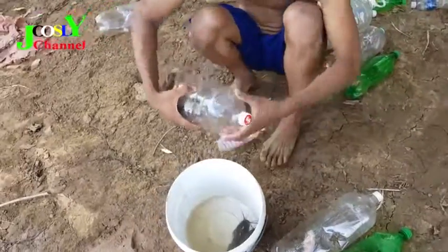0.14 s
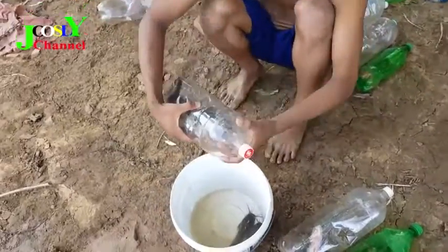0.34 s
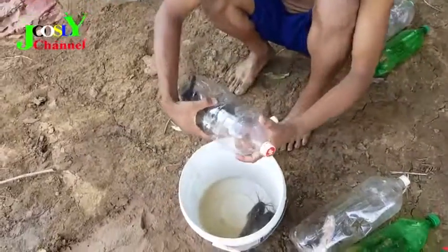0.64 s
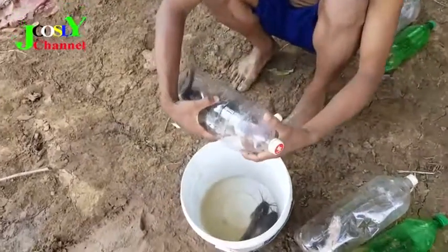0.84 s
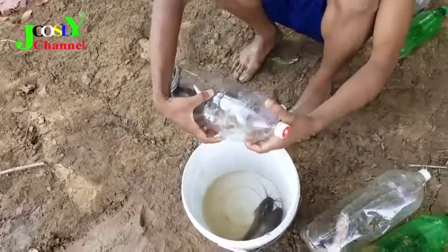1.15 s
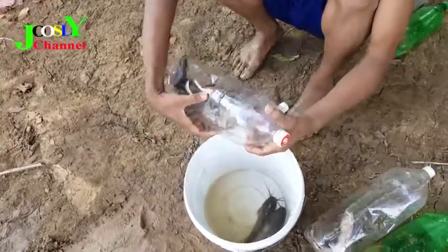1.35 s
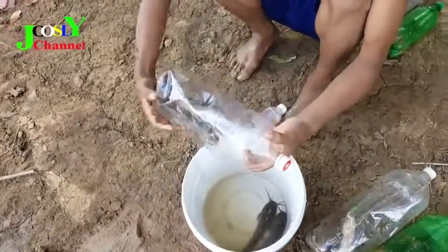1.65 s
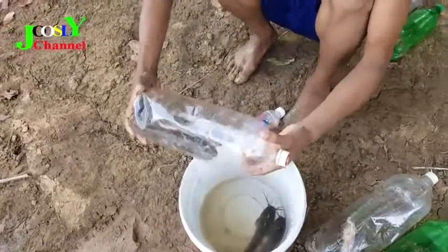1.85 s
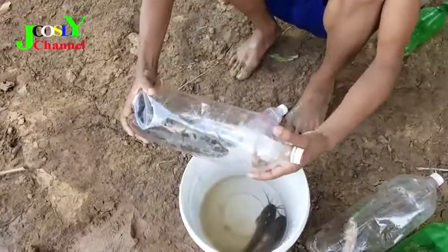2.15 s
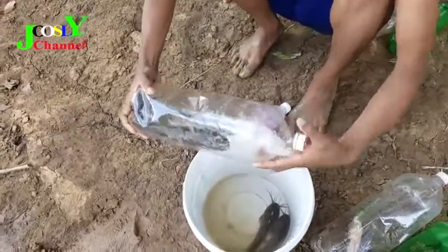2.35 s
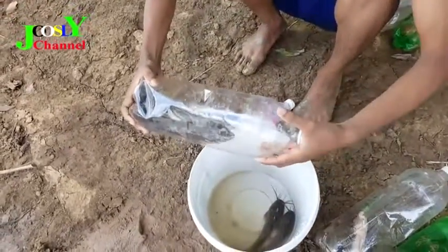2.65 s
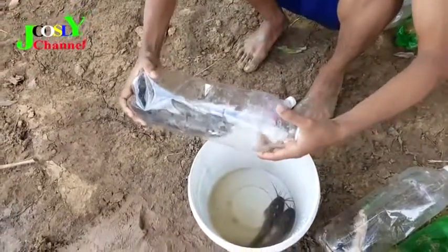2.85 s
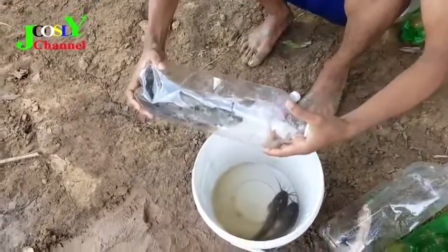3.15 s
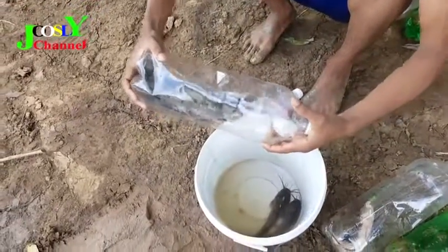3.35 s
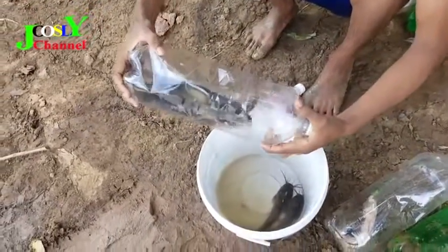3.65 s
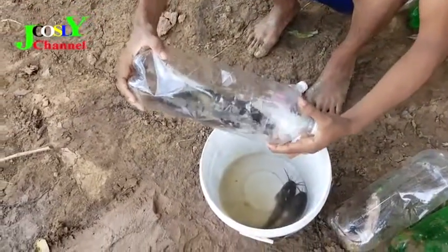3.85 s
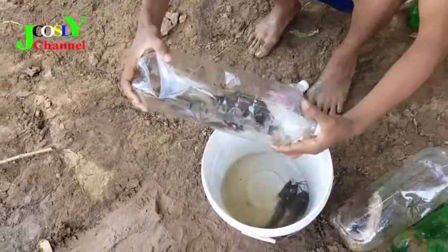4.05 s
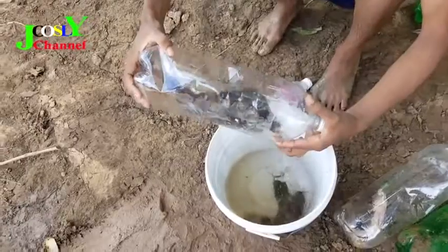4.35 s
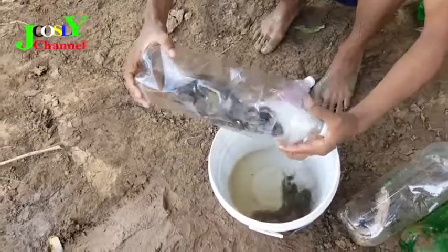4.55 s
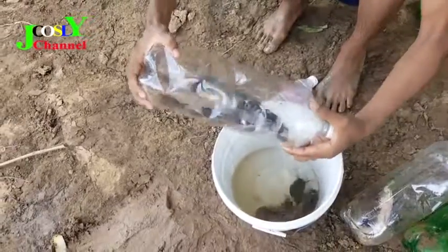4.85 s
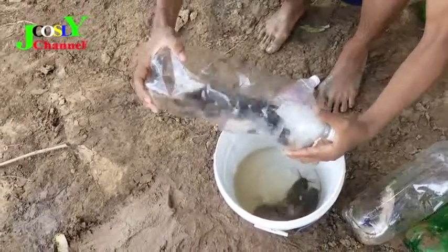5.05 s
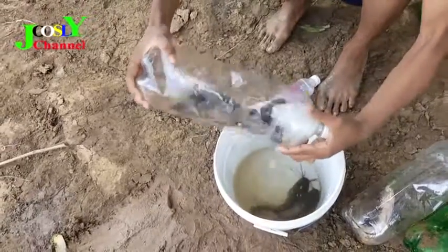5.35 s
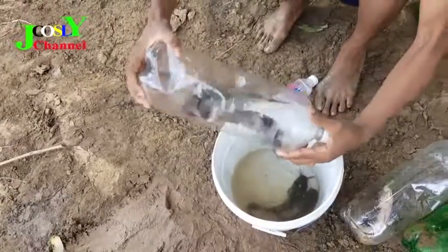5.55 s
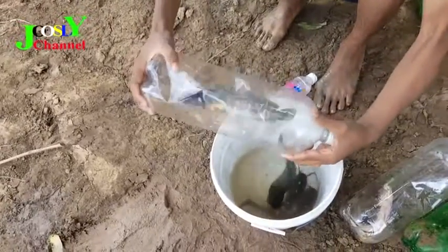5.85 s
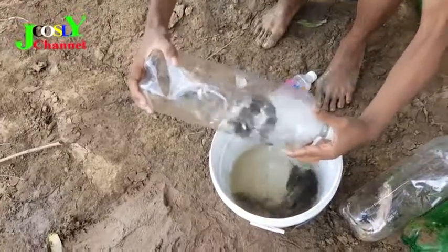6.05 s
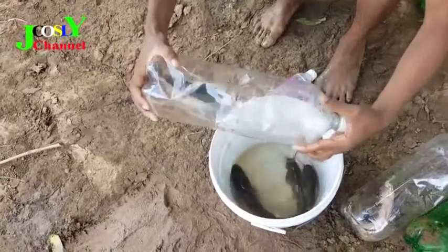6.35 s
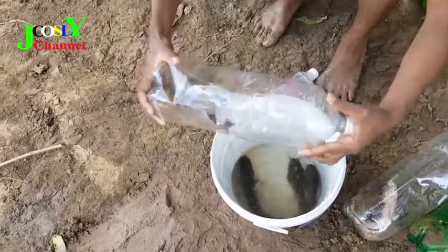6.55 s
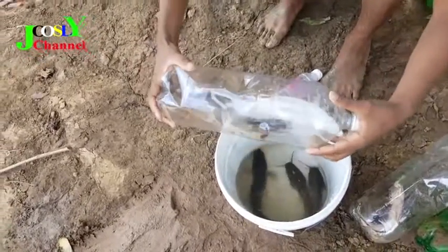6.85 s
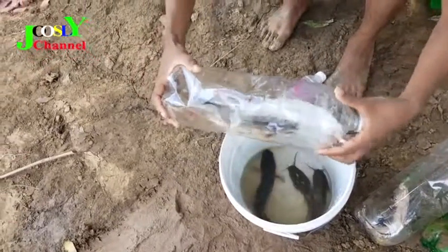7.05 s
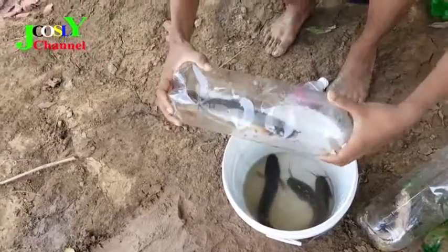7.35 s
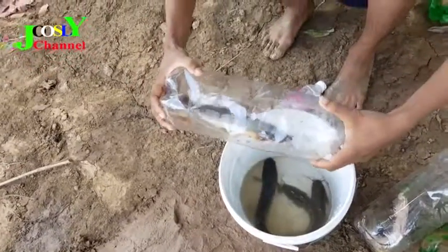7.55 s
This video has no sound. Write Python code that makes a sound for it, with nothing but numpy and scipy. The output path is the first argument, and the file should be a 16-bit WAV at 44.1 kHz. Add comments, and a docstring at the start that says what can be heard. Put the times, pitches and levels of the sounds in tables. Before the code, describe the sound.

A large thin plastic bottle is squeezed close to the microphone outdoors, over a faint steady rumble and hiss. For the first three seconds it buckles in irregular sharp snaps and hollow crackles, with dense clusters around 1.2 seconds and from 2.5 to 3.2 seconds, and soft rubbing in between. A lull follows. Just after 4 seconds come tiny wet squeaks and water blips, and water starts leaving the neck in short, light spurts. From about 4.8 to 6.3 seconds fish slither and scrape along the plastic wall, among small bubbling drips, wet ticks and occasional duller snaps. The water stops by about 6.4 seconds, as the bottle gives a few more loud snaps lasting until 6.6 seconds. Two very faint, falling bird notes sound far off at about 6.4 and 7 seconds. Only light rubbing and the outdoor background remain until about 7.7 seconds.

```python
"""A large thin plastic bottle is squeezed and tipped over a bucket outdoors while fish slither inside.
Its wall buckles in snaps and wet bodies scrape along it; both are runs of small slips that excite the
modes of the wall and the boom of the enclosed air. Wet squeaks and short tonal water blips glide in
pitch, and water leaves the neck in gushes of spray and tiny ringing bubbles. Two faint bird notes come
near the end. All this reaches two microphone ports, over the far rumble and hiss of a yard."""
import sys
import numpy as np
from scipy import signal
from scipy.fft import rfft, irfft, next_fast_len
from scipy.io import wavfile
from scipy.ndimage import uniform_filter1d

SR = 44100
rng = np.random.default_rng(int(sys.argv[2]) if len(sys.argv) > 2 else 0)


def file_out(sig):
    """Save sig as 16-bit WAV at sys.argv[1]."""
    # one column per channel
    cols = np.atleast_2d(sig).T
    # limit, then scale
    lim = np.clip(cols, -1, 1)
    pcm = np.round(lim * 32767).astype(np.int16)
    wavfile.write(sys.argv[1], SR, pcm)


N = 339129

# Hands and fish sliding on plastic. Each row: time in seconds, relative skin and fizz levels in dB.
SLITHER_LEVELS = [(0.0, -51, -64), (0.81, -54.5, -65), (1.26, -52, -66), (1.43, -52, -63.5),
                  (2.27, -54.5, -62), (2.67, -53.5, -54), (2.7, -52, -52.5), (2.8, -51.5, -46.5),
                  (2.87, -52.5, -57), (2.94, -46, -52), (3.149, -60.5, -78), (3.41, -59, -74),
                  (4.15, -55, -66), (4.3, -54, -64), (4.65, -56, -65), (5.08, -47.5, -50),
                  (5.2, -56.5, -64), (5.74, -50.5, -63), (6.04, -46, -59), (6.19, -64, -62),
                  (6.51, -46.5, -59.5), (6.87, -54, -63.5), (7.69, -57, -68.5)]
# Spectrum of that friction. Each row: frequency in Hz, relative density in dB.
SKIN_SPECTRUM = [(71, -37.5), (120, 6.5), (323, 4), (428, -9.5), (629, -0.5), (942, -4), (1470, -37),
                 (1910, -11.5), (2250, 0), (2800, -13), (4650, -15.5), (6420, -31), (8500, -37.5),
                 (11000, -41.5), (15000, -43.5)]
# Spectrum of the far rumble and hiss. Each row: frequency in Hz, relative density in dB.
YARD_SPECTRUM = [(15, -39.5), (25, -50), (97, 6.5), (149, -0.5), (229, -15.5), (301, -7.5), (363, -14),
                 (607, -20.5), (1020, -15.5), (1130, -15.5), (1560, -17.5), (2350, -23.5), (2840, -26),
                 (4250, -31), (16000, -61)]
# Slow dips and swells of that noise. Each row: time in seconds, relative level in dB.
YARD_LEVELS = [(0.0, -47.5), (2.72, -49), (3.41, -57.5), (4.03, -47.5), (4.52, -50.5), (5.46, -46),
               (7.69, -50)]
# Likeness of that noise in the two channels. Each row: frequency in Hz, left-right correlation.
YARD_CORRELATION = [(30, 0.75), (60, 0.95), (150, 0.96), (380, 0.81), (950, -0.15), (2380, -0.31),
                    (5980, -0.21), (15000, 0.11)]
# The bottle's five bands, from low to high: boom, knock, clack, tick, fizz. Each entry: an edge in Hz.
BAND_EDGES_HZ = [200, 450, 1500, 3000, 7000, 15500]
# Bottle modes, air column first, then wall. Each row: frequency in Hz, relative level in dB,
# T60 in seconds before added damping.
BOTTLE_MODES = [(272, 8, 0.1), (295, 15, 0.125), (380, 5, 0.017), (414, 3.5, 0.05), (626, 4, 0.075),
                (729, 8, 0.04), (950, 4, 0.043), (1180, 5, 0.03), (1700, 5, 0.05), (2165, 8, 0.035),
                (4030, 3.5, 0.016), (4570, 6, 0.018), (4840, 10.5, 0.012), (5530, 7, 0.02)]
# Dense wall modes, heard as a rattle. Each row: frequency in Hz, T60 in seconds before added damping.
RATTLE_DECAY = [(150, 0.33), (400, 0.06), (1000, 0.069), (2800, 0.057), (7300, 0.059), (15000, 0.15)]
# Spectrum of that rattle. Each row: frequency in Hz, relative level in dB.
RATTLE_SPECTRUM = [(150, -10), (300, -3.5), (600, -1), (1500, -7), (2200, 1), (3200, -16.5), (4500, -2.5),
                   (5600, -20.5), (7500, -34.5), (10000, -29), (15500, -44)]
# Fish and water slide to the neck and damp the wall. Each row: time in seconds, share of ring time left.
WALL_DAMPING = [(3.3, 1.), (4.5, .4), (5, .6), (6.1, .55), (6.4, .9)]
# Scrapes along the wall. Each row: centre in seconds, panel frequency in Hz, knock peak in dB,
# boom over knock in dB, tick over knock (sharpness) in dB, stroke time in ms.
WALL_SCRAPES = [(0.159, 2500, -51, 14, -7, 13), (0.745, 650, -46.5, 18.5, -23, 15.4),
                (1.037, 1035, -44, -3, -2, 14), (1.228, 680, -23, -7, -11, 9),
                (1.246, 710, -28.5, 0, -0.5, 19), (1.293, 660, -38.5, 5, -2, 53),
                (1.358, 2180, -52.5, -5, 11, 12), (1.366, 410, -42, 7, -8, 54),
                (2.439, 600, -48.5, 2, -18, 15), (2.492, 625, -28.5, 2, -23, 13.6),
                (2.915, 660, -43, -12, -3, 27), (3.13, 695, -46, -1, -11.5, 10),
                (4.207, 668, -54.5, 14, 2, 71), (4.254, 700, -67, 8, 21.5, 56),
                (4.345, 2220, -76, 4, 14, 34), (4.498, 2290, -84.5, 5, 29, 10),
                (4.541, 2280, -87.5, 25, 33, 15), (4.709, 2360, -62.5, -3, 7.5, 15),
                (4.82, 590, -43.5, -4, -36, 20), (4.862, 635, -45.5, -5, -3.5, 17),
                (4.95, 636, -41.5, 2, -9, 62), (5.095, 755, -38, -10, -11, 9.1),
                (5.227, 675, -56, 15, -2, 16), (5.267, 520, -44, 7, -9.5, 28),
                (5.363, 680, -36, -3, -9, 25), (5.407, 595, -31, -2.5, -12.5, 23),
                (5.478, 590, -41.5, -1, -9, 81), (5.525, 894, -41.5, 3, -4, 26),
                (5.613, 2060, -42, -18, -6.5, 25), (5.639, 654, -47, -2, -5, 69),
                (5.67, 600, -39, 2.5, -7, 18), (5.79, 1160, -34.5, -3.5, -9.5, 37),
                (5.919, 610, -35, 4.5, -1.5, 62), (5.96, 640, -37.5, 1, -19, 3.4),
                (6.048, 606, -33, 3, -15, 23.5), (6.184, 700, -43, -6, -0.5, 51),
                (6.269, 720, -42.5, 4, -11, 49), (7.113, 2470, -72.5, 16, 20.5, 27)]
# Snaps of the wall. Each row: start in seconds, panel frequency in Hz, knock peak in dB, boom over
# knock in dB, tick over knock (sharpness) in dB, fizz over tick in dB, buckling time in ms.
WALL_SNAPS = [(0.212, 430, -44, -3, -36, -6, 4.8), (0.378, 1285, -19.5, -1, -7.5, -21, 1.54),
              (0.411, 1254, -29, -31, -14, -16, 3.7), (0.431, 930, -38, 5, 5.5, -9.5, 2.1),
              (0.509, 443, -46, 6.5, -3.5, -1, 2.2), (0.687, 455, -39.5, -14, -28, -11, 3.7),
              (0.723, 757, -30, 3.5, -81, 1, 7.6), (0.863, 1030, -15, -17, -11.5, -14, 1.36),
              (1.096, 686, -27, -11, -1.5, -8, 0.93), (1.186, 2340, -36, -2, 2, -13, 1.8),
              (1.227, 700, -18.5, -10, -9, -7.5, 5.9), (1.265, 420, -20.5, -3.5, -5, -2.5, 3.6),
              (1.297, 2330, -29, -4, -3, -7, 4.1), (1.314, 460, -26.5, -26, 2, -3.5, 4),
              (1.339, 2020, -36, -13, 4.5, -11, 4.6), (1.574, 607, -25.5, -8, -32, -1, 2.25),
              (1.738, 2290, -21, -1.5, 3.5, -21, 3.5), (1.919, 652, -27.5, 2, -22.5, -8, 2),
              (2.024, 610, -44, 1, -11, -22, 7.2), (2.451, 560, -32, -1.5, -11.5, -12, 8.1),
              (2.473, 457, -28, -25, 6, -11, 0.94), (2.624, 748, -16, -11.5, -6.5, -42, 0.39),
              (2.649, 594, -32, -7, -4.5, -15, 0.94), (2.7, 1460, -38, -19, -1.5, -3, 1.3),
              (2.814, 513, -40.5, -22, 0, -2, 8.4), (2.873, 1686, -16.5, 1, -1, -9, 6.3),
              (2.951, 740, -14, -7, -20.5, -17, 2.7), (2.985, 640, -25.5, -8, -4, -12, 2.9),
              (3.018, 537, -20.5, -7.5, -13, -38, 2.9), (3.082, 1300, -41.5, -3, 6, -9, 2.4),
              (3.189, 747, -19, -16.5, -8.5, -18.5, 1.1), (3.336, 2240, -47.5, -25, 5.5, -4, 2.3),
              (3.937, 760, -36.5, -1.5, -59, 0, 0.76), (4.16, 735, -46.5, -7, 2, -8, 6.5),
              (4.179, 432, -34.5, 8, -32, 16, 2.8), (4.322, 2520, -47.5, -19, 7.5, -18, 0.67),
              (4.645, 650, -19.5, -4, -35, -15, 0.78), (5.025, 2510, -54.5, 7, 21.5, -17, 3.3),
              (5.13, 670, -37, 10, -12.5, -4, 10.5), (5.505, 900, -33, -2, -12, -14, 3.5),
              (6.03, 590, -22.5, -20, -19, -16, 3.7), (6.077, 990, -36, -19, -15, -16, 5.4),
              (6.147, 1280, -38, -27, -0.5, 7.5, 4.3), (6.399, 660, -18, -2.5, -13.5, -10.5, 2.2),
              (6.513, 2076, -18.5, -2, -3.5, -18, 5.3), (6.596, 497, -30, 4.5, -60, 3, 30),
              (6.622, 1092, -19.5, -8, -9, -19, 5), (6.795, 2090, -43, -16, -2, -13, 2)]
# Wet squeaks and short tonal water blips. Each row: start in seconds, length in ms, first, middle and
# last frequency in Hz, level in dB, relative overtone level in dB.
SQUEAKS_AND_BLIPS = [(4.112, 14, 4000, 4230, 4300, -53, -30), (4.125, 10.6, 1740, 2150, 3020, -34.5, -25),
                     (4.135, 18, 1870, 2040, 2820, -38, -28), (4.165, 4.6, 4600, 4600, 4700, -35, -19),
                     (4.402, 38, 756, 1133, 424, -36.5, -8), (5.035, 8.2, 4260, 4030, 4000, -36, -30),
                     (5.05, 8.3, 3930, 4000, 4300, -42, -30), (6.04, 7.9, 4780, 4780, 5000, -37.5, -28),
                     (6.073, 9.6, 2430, 2490, 2500, -40, -30), (6.109, 13.5, 3800, 3940, 3980, -38.5, -21),
                     (6.173, 13, 2520, 2500, 2570, -36.5, -30), (7.099, 17, 2600, 2575, 2560, -46, -30)]
# Gushes out of the neck. Each row: start in seconds, length in ms, spray level in dB.
WATER_GUSHES = [(4.165, 107, -53), (4.32, 72, -53), (4.492, 65, -58), (4.59, 40, -57.5), (4.7, 89, -60),
                (4.85, 36, -54), (4.905, 180, -53), (5.072, 17, -60), (5.13, 16, -60), (5.213, 69, -51.5),
                (5.342, 45, -52), (5.39, 39, -60), (5.45, 63, -61), (5.505, 38, -55), (5.598, 82, -51),
                (5.755, 99, -50), (5.86, 95, -53), (6.03, 30, -46), (6.162, 42, -57), (6.26, 83, -58)]
# Spectrum of the spray. Each row: frequency in Hz, relative density in dB.
SPRAY_SPECTRUM = [(1200, -8), (3000, 0), (4600, 7), (6000, -3), (7500, -7), (10000, -6), (13000, -6.5),
                  (16000, -8)]
# Single wet ticks. Each row: start in seconds, relative level in dB, frequency in Hz.
WET_TICKS = [(4.9082, -40, 5020), (4.9242, -32, 4750), (4.9531, -44, 3900), (4.9746, -31, 4940),
             (5.121, -38, 4680), (5.1402, -34, 4620), (5.223, -32, 4770), (5.359, -25, 4340),
             (5.4505, -38, 4150), (5.955, -28, 3680), (6.3723, -30, 4000)]
# Far bird notes. Each row: start and length in seconds, first, middle and last frequency in Hz,
# level in dB, loudest moment as a share of the length.
BIRD_NOTES = [(6.442, 0.073, 3020, 2700, 2600, -49.5, .6), (6.974, 0.057, 3060, 2760, 2600, -58, .2)]
# Stereo width of the two microphone ports. Each row: frequency in Hz, difference over sum in dB.
PORT_WIDTH = [(60, -14), (110, -15), (200, -22), (380, -20), (700, -16.5), (1290, -10), (2380, -1),
              (4400, 0), (8120, 0.5), (15000, 1)]
# Balance the ports lean toward. Each row: frequency in Hz, left minus right in dB.
PORT_LEAN = [(140, -3), (210, -1.5), (330, -2), (500, -1.5), (770, -1), (1170, -0.5), (1790, 0.5),
             (2740, 0.5), (4190, -12.5), (6410, -5.5), (9810, 3), (15000, -1)]

BAND_FILTERS = [signal.butter(4, edges, "band", fs=SR, output="sos")
                for edges in zip(BAND_EDGES_HZ, BAND_EDGES_HZ[1:])]


def amp(db):
    """Amplitude ratio of a level in decibels."""
    return np.exp(np.asarray(db) * np.log(10) / 20)


def unit_rms(x):
    """Normalisation to unit mean power."""
    return x / np.sqrt(np.mean(x ** 2) + 1e-20)


def at_hz(table, hz):
    """Interpolation on a logarithmic frequency axis."""
    f, value = np.transpose(table)
    return np.interp(np.log(hz + 1), np.log(f + 1), value)


def add(mix, s, sound):
    """Superposition of a sound on the mix, starting at s seconds."""
    part = mix[round(s * SR):][:len(sound)]
    part += sound[:len(part)]


def coloured(x, spectrum):
    """Zero-phase filtering by a table of gains in dB."""
    return irfft(rfft(x) * amp(at_hz(spectrum, np.fft.rfftfreq(len(x), 1 / SR))), len(x))


def glide(u, first, middle, last):
    """Parabolic interpolation through three values at u = 0, 0.5 and 1."""
    return np.polyval(np.polyfit([0, .5, 1], [first, middle, last], 2), u)


def grains(impulses, t60_s):
    """Incoherent addition: each impulse starts a decaying noise, and their powers sum."""
    fade = np.exp(-2 * np.log(1000) / (t60_s * SR))
    power = signal.lfilter([1], [1, -fade], impulses ** 2)
    return np.sqrt(power) * rng.standard_normal(N)


def slither():
    """Sliding friction: fine uneven grains heard through the wall as dull body, bright skin and fizz."""
    s, skin_db, fizz_db = np.transpose(SLITHER_LEVELS)
    body_db = -48 + 1.83 * (skin_db + 50.5)  # the body grows faster than the skin
    slips = amp(3.1 * np.minimum(rng.exponential(1, N), 5)) * (rng.random(N) < 5000 / SR)
    clumps = amp(1.6 * unit_rms(uniform_filter1d(rng.standard_normal(N), size=700)))
    friction = coloured(grains(slips * clumps, t60_s=0.039), SKIN_SPECTRUM)
    out = np.zeros(N)
    for edges_hz, db in [((150, 1200), body_db), ((1200, 7000), skin_db), ((7000, 15800), fizz_db)]:
        band = signal.sosfilt(signal.butter(3, edges_hz, "band", fs=SR, output="sos"), friction)
        out += unit_rms(band) * amp(np.interp(np.arange(N) / SR, s, db) - 2.5)
    return out


def yard():
    """Partially coherent stereo noise: far rumble and hiss with drifting patches in its spectrum."""
    frames, hz = N // 256 + 5, np.fft.rfftfreq(1024, 1 / SR)
    a, b, c, d, patches = rng.standard_normal((frames, 513, 5)).T
    patches = unit_rms(uniform_filter1d(uniform_filter1d(patches, size=10, axis=0), size=12, axis=1))
    correlation = at_hz(YARD_CORRELATION, hz)[:, None]
    left = a + 1j * b
    right = correlation * left + np.sqrt(1 - correlation ** 2) * (c + 1j * d)
    spectra = np.array([left, right]) * amp(at_hz(YARD_SPECTRUM, hz)[:, None] + 1.75 * patches)
    noise = unit_rms(signal.istft(spectra, nperseg=1024, noverlap=768)[1][:, :N])
    level_db = np.interp(np.arange(N) / SR, *np.transpose(YARD_LEVELS)) + 4.5
    return noise * amp(level_db + np.array([[-.7], [.7]]))


def wall_rattle(slips, length, ring_share):
    """Modal overlap: modes too dense to tell apart act as noise that decays after each slip."""
    hz, t, noise = signal.stft(rng.standard_normal(length), SR, nperseg=128)
    crack = amp(4 - 60 * t / 0.0092)  # the dry first instant decays alike at all frequencies
    decay = crack + amp(-60 * t / np.sqrt(ring_share) / at_hz(RATTLE_DECAY, hz)[:, None])
    frame_energy = np.add.reduceat(slips ** 2, np.arange(0, len(slips), 64))
    power = signal.fftconvolve(decay ** 2, frame_energy[None], axes=1)[:, :len(t)]
    spectra = noise * amp(at_hz(RATTLE_SPECTRUM, hz)[:, None]) * np.sqrt(abs(power))
    rattle = signal.istft(spectra, SR, nperseg=128)[1][:length]
    onset = np.minimum(1, np.arange(length) / 30)
    return rattle * onset * np.minimum(1, np.linspace(10, 0, length))


def bottle_ring(s, slips, panel_hz, rattle_db=25):
    """Convolution: slips excite damped modes, whose tuning and strength vary with each grip."""
    t = np.arange(SR // 10) / SR
    ring_share = np.interp(s, *np.transpose(WALL_DAMPING))
    age = t / ring_share  # a damped wall dies sooner
    hz, db, t60 = np.transpose(BOTTLE_MODES)[:, :, None]
    detune, uneven = rng.standard_normal((2, len(BOTTLE_MODES), 1))
    modes = amp(db + 3.5 * uneven - 60 * age / t60) * np.sin(2 * np.pi * hz * (1 + 0.045 * detune) * t)
    panel = amp(21 - 60 * age / 0.032) * np.sin(2 * np.pi * panel_hz * t)  # the patch that buckles
    response = (modes.sum(0) + panel) * np.minimum(1, 10 - 10 * t / t[-1])
    tones = signal.fftconvolve(slips, response)
    return tones + amp(rattle_db) * wall_rattle(slips, len(tones), ring_share)


def band_levels(panel_hz, knock_db, boom_db, clack_db, sharp_db, fizz_db):
    """Spectral balance of boom, knock, clack, tick and fizz in dB; a smaller panel clacks more."""
    panel_db = 2 * np.log2(panel_hz / 1000)
    return knock_db + np.array([boom_db, 0, clack_db + panel_db, sharp_db, sharp_db + fizz_db])


def balanced(sound, levels_db, window_samples):
    """Filter-bank equalisation: each band's greatest short-time rms is set to its level."""
    out = np.zeros(len(sound))
    for sos, db in zip(BAND_FILTERS, levels_db):
        band = signal.sosfilt(sos, sound)
        out += amp(db) * band / np.sqrt(uniform_filter1d(band ** 2, size=window_samples).max())
    return out


def scrapes(slips_per_s=3000):
    """Frictional excitation: a wet body drags along the wall in small slips that swell and fade."""
    out, lead_s = np.zeros(N), 1 / 14
    for s, panel_hz, knock_db, boom_db, sharp_db, stroke_ms in WALL_SCRAPES:
        u = (np.arange(SR // 7) / SR - lead_s) * 1000 / max(stroke_ms, 5)
        slipping, size = rng.random(len(u)) < slips_per_s / SR, rng.standard_normal(len(u))
        slips = slipping * size * abs(size) * np.exp(-2.2 * u ** 2)
        clack_db = 0.69 * sharp_db
        levels_db = band_levels(panel_hz, knock_db, boom_db, clack_db, sharp_db, fizz_db=-10)
        ring = bottle_ring(s, slips, panel_hz)
        add(out, s - lead_s - .005, balanced(ring, levels_db, window_samples=700))
    return out


def snaps(slips_per_s=5000, rise_ms=1.22):
    """Snap-through buckling: a crease jumps over in slips that build quickly, then die away."""
    out, ms = np.zeros(N), np.arange(SR // 30) * 1000 / SR
    for s, panel_hz, knock_db, boom_db, sharp_db, fizz_db, buckle_ms in WALL_SNAPS:
        slipping, size = rng.random(len(ms)) < slips_per_s / SR, rng.standard_normal(len(ms))
        slips = slipping * size * (1 - np.exp(-ms / rise_ms)) * np.exp(-ms / buckle_ms)
        slips[0] = 0.15
        clack_db = -3.5 + 0.23 * sharp_db
        levels_db = band_levels(panel_hz, knock_db, boom_db, clack_db, sharp_db, fizz_db)
        add(out, s, balanced(bottle_ring(s, slips, panel_hz), levels_db, window_samples=260))
    return out


def squeaks_and_blips(roughness=.45):
    """Frequency and amplitude modulation: wet squeaks and short tonal water blips glide and flutter."""
    out = np.zeros(N)
    for s, ms, first_hz, middle_hz, last_hz, db, overtone_db in SQUEAKS_AND_BLIPS:
        u = np.linspace(0, 1, round(ms * SR / 1000))
        hz = glide(u ** .65, first_hz, middle_hz, last_hz)
        jitter = 1 + roughness * uniform_filter1d(rng.standard_normal(2000), size=40)[:len(u)]
        flutter = 1 + 4 * roughness * uniform_filter1d(rng.standard_normal(2000), size=20)[:len(u)]
        phase = 2 * np.pi * np.cumsum(hz * jitter) / SR
        overtones = sum(np.sin(k * phase) / (k - 1) ** .5 for k in (2, 4, 5))
        tone = np.sin(phase) + amp(overtone_db) * overtones
        add(out, s, np.sqrt(2) * amp(db) * tone * np.sin(np.pi * u ** 0.74) * flutter)
    return out


def spray(rise_s=0.0099, fall_s=0.012, ticks_per_s=900, spread_db=4.5):
    """Shot noise: each gush is a close run of bright ticks, a few large, that starts, holds and stops."""
    t, flow = np.arange(N) / SR, np.zeros(N)
    for s, ms, db in WATER_GUSHES:
        since_end = np.maximum(t - (s + ms / 1000), 0)
        flow += amp(db) * np.clip((t - s) / rise_s, 0, 1) * np.exp(-since_end / fall_s)
    size = amp(spread_db * np.minimum(rng.exponential(1, N), 4))
    ticks = grains(size * (rng.random(N) < ticks_per_s / SR), t60_s=.022)
    return flow * unit_rms(coloured(ticks, SPRAY_SPECTRUM))


def bubble(hz):
    """Bubble resonance: about nine cycles of a tone that rises a little."""
    u = np.linspace(0, 1, round(9 * SR / hz))
    return np.sin(2 * np.pi * 9 * (u + 0.044 * u ** 2)) * np.sin(np.pi * u ** 0.36)


def drops(start_s=4.75, end_s=6.4):
    """Bubble emission from running water: random blips that follow the skin level, and wet ticks."""
    times, skin_db, _ = np.transpose(SLITHER_LEVELS)
    out = np.zeros(N)
    for place, pitch, size in rng.random((400, 3)):
        s = start_s + place * (end_s - start_s)
        db = np.interp(s, times, skin_db) - 4 + 16 * size ** 3
        add(out, s, amp(db) * bubble(700 * 7.5 ** pitch))
    for s, db, hz in WET_TICKS:
        for late, detune in rng.random((3, 2)):  # each tick is a tight cluster
            add(out, s + 0.0096 * late, amp(db - 7.5) * bubble(hz * (0.88 + 0.24 * detune)))
    return out


def birds(fade_db_per_length=6):
    """Frequency modulation: short bending whistles that swell to one loudest moment."""
    out = np.zeros(N)
    for s, length_s, first_hz, middle_hz, last_hz, db, loudest in BIRD_NOTES:
        u = np.linspace(0, 1, round(length_s * SR))
        phase = 2 * np.pi * np.cumsum(glide(u, first_hz, middle_hz, last_hz)) / SR
        envelope = amp(db - fade_db_per_length * abs(u - loudest)) * signal.windows.tukey(len(u), .4)
        add(out, s, np.sqrt(2) * envelope * np.sin(phase))
    return out


def scattering(x, t60_s=0.015, drift_hz=1.7):
    """Multipath echoes off ground and bucket drift between two patterns as the bottle moves."""
    t = np.arange(SR // 40) / SR
    echoes = rng.standard_normal((2, len(t))) * amp(-60 * t / t60_s)
    drift = np.cos(2 * np.pi * (drift_hz * np.arange(N) / SR - np.arange(2)[:, None] / 4))
    return signal.oaconvolve(x * drift, echoes, axes=1)[:, :N].sum(0) / np.linalg.norm(echoes[0])


def microphone_ports(x, scattered=0.86):
    """Sum-and-difference stereo: the ports' difference is their sum turned in phase, partly scattered."""
    size = next_fast_len(N + SR // 10)
    hz = np.fft.rfftfreq(size, 1 / SR)
    width = amp(at_hz(PORT_WIDTH, hz))
    lean = np.tanh(at_hz(PORT_LEAN, hz) * np.log(10) / 20)
    in_phase = np.clip(lean * (1 + width ** 2) / (2 * width), -1, 1)  # this part tips the balance
    rest = np.sqrt(1 - in_phase ** 2)
    direct = (in_phase + 1j * rest * np.sqrt(1 - scattered ** 2)) * rfft(x, size)
    diffuse = rest * scattered * rfft(scattering(x), size)
    difference = irfft(width * (direct + diffuse), size)[:N]
    return np.array([x + difference, x - difference])


def scene():
    """Superposition: bottle, water and birds through the ports, over the noise of the yard."""
    sources = snaps() + scrapes() + squeaks_and_blips() + slither() + drops() + spray() + birds()
    return microphone_ports(sources) + yard()


def record(dry):
    """Band limiting and saturation: microphone bass cut, an input stage that rounds peaks, low-pass."""
    bass_cut_hz, ceiling, edge_hz = 50, .93, 16100
    thinned = signal.sosfilt(signal.butter(2, bass_cut_hz, "high", fs=SR, output="sos"), dry)
    rounded = thinned / (1 + abs(thinned / ceiling) ** 6) ** (1 / 6)
    low_pass = signal.firwin(511, edge_hz, window=("kaiser", 9), fs=SR)
    return signal.oaconvolve(rounded, low_pass[None], "same")


dry = scene()
out = record(dry)
file_out(out)
```